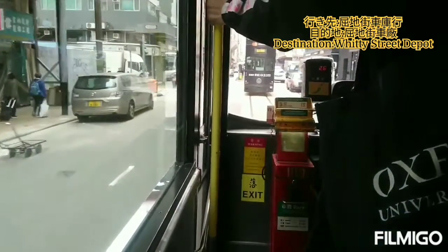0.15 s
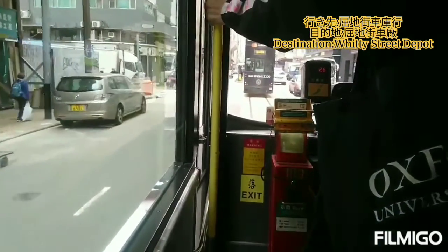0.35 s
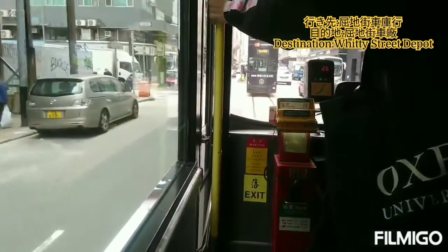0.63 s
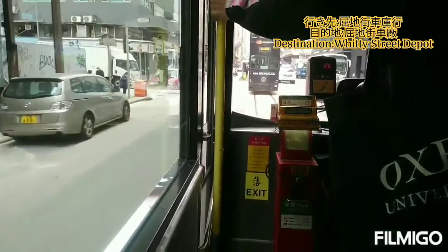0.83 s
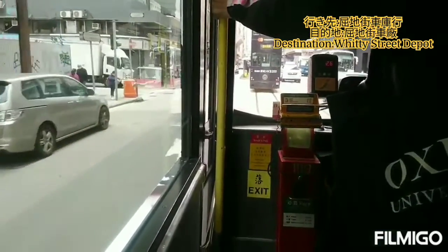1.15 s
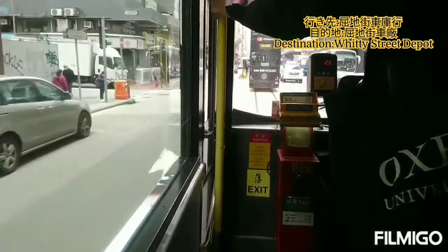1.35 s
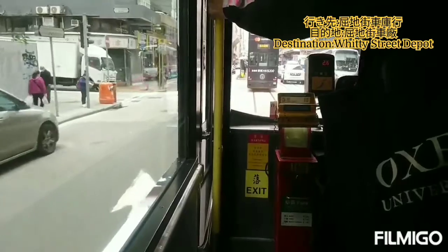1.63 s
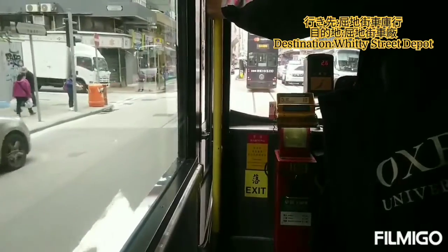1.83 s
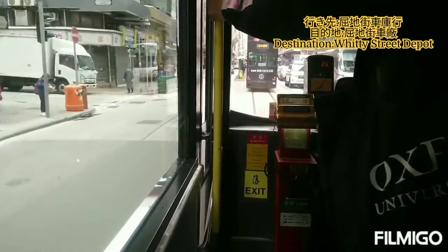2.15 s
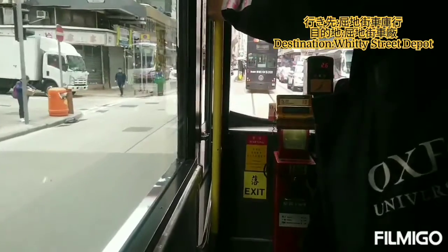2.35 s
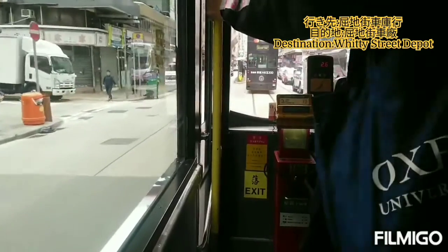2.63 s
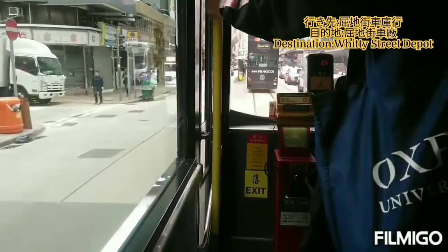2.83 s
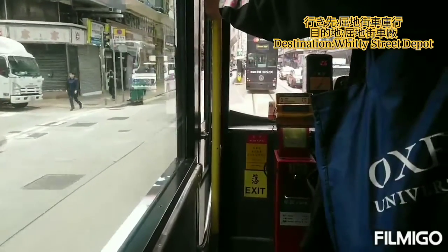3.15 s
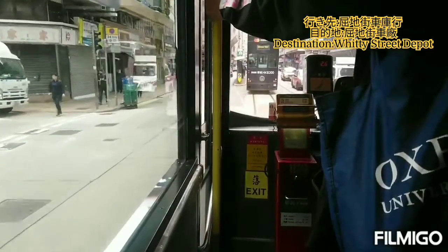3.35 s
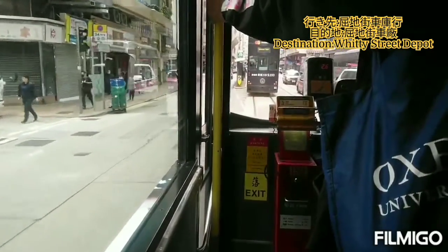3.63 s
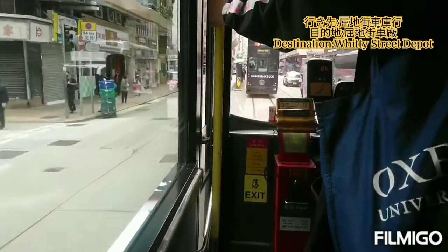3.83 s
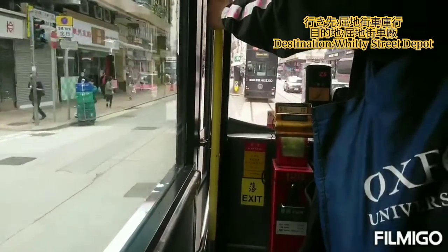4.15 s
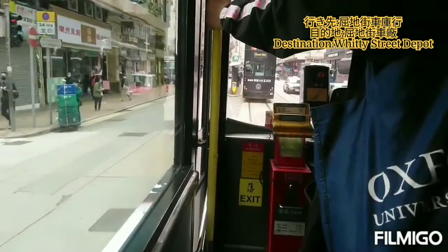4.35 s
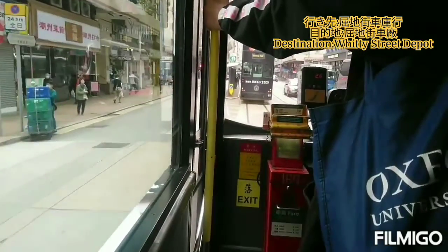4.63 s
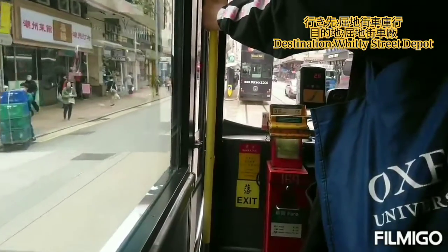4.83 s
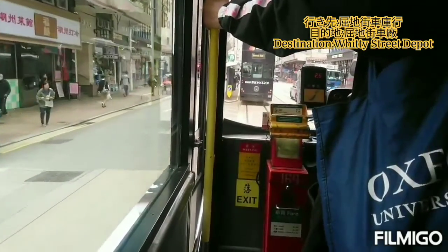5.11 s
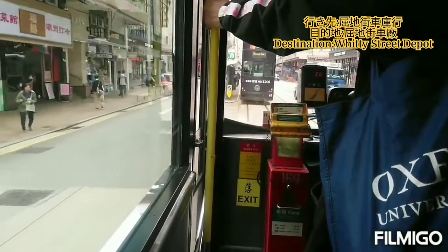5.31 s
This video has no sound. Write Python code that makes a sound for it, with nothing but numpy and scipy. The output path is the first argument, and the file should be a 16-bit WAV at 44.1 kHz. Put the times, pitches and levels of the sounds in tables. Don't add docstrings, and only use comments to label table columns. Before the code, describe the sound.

Wheels slam over rail joints at the very start, shaking the floor and panels of a tram with loud dense thuds and short metallic clatter. The car then rolls with a low, uneven rumble, soft taps and faint rattles. Another clear jolt lands just before two seconds, lighter ones near four and four and a half, then a faint wavering gear groan. Heard by a small microphone inside the cabin.

```python
import sys
import numpy as np
from scipy import signal
from scipy.io import wavfile
from scipy.ndimage import uniform_filter1d

SR = 44100
rng = np.random.default_rng(int(sys.argv[2]) if len(sys.argv) > 2 else 0)


def decibels_to_gain(level_db):
    exponent = np.asarray(level_db, float) / 20
    return 10 ** exponent


def dump(signal):
    limited = np.clip(np.atleast_2d(signal).T, -1, 1)
    pcm = np.round(limited * 32767).astype(np.int16)
    wavfile.write(sys.argv[1], SR, pcm)


N = 241336

# start_s, over_usual_db
RAIL_ROUGHNESS = [(0, -11.5), (.36, 3.5), (.5, 0.5), (.85, 2.5), (1.2, -0.5), (1.42, 1.5), (1.75, -2),
                  (2.05, -0.5), (2.25, 0), (2.77, 0.5), (3.1, -0.5), (3.6, -2), (3.95, 1), (4.3, -0.5),
                  (4.6, 7.5), (4.85, 2.5), (5.1, 2), (5.47, 0.5)]

# pitch_hz, width_hz, level_db
FLOOR_MODES = [(48, 7.6, -3.5), (68, 6.4, -6.5), (81.8, 13.6, -4)]
PANEL_MODES = [(126.8, 12, -10.5), (166.8, 13.5, -0.5), (196, 11.2, -1.5), (252, 8.9, -3.5),
               (292.7, 24.2, -1), (321.6, 13, -10.5)]
FRAME_MODES = [(375, 43, 1), (421, 52, -6.5), (500, 51, -4), (580, 120, -4.5), (688, 75, -14.5),
               (770, 86, -11)]
WHEEL_MODES = [(901, 120, -0.5), (1050, 110, -7.5), (1208, 160, -2.5), (1466, 170, -9), (1598, 440, -3.5)]
WINDOW_MODES = [(2120, 280, 1.5), (2400, 270, 1.5), (2623, 74, -2), (2850, 79, -3.5), (3180, 400, 1.5),
                (3300, 290, -10), (3870, 1100, -6.5)]
SMALL_METAL_MODES = [(4500, 360, -4.5), (5370, 300, -9), (5650, 610, -7), (6160, 130, -5)]
STRAP_MODES = [(7800, 450, 3.7), (8400, 350, 6), (9300, 440, 4)]
# pitch_hz, width_hz, level_db
PANE_MODES = [(3050, 200, -3.5), (3130, 240, -2.5), (3460, 460, -2.5)]
# pitch_hz, width_hz, level_db
CATCH_MODES = [(5160, 200, 1), (5300, 400, -2)]
# pitch_hz, width_hz, level_db
BUCKLE_MODES = [(9960, 250, -2.5), (10400, 250, 0.5)]
# pitch_hz, width_hz, level_db
SPRING_MODES = [(6160, 64, 0)]

# start_s, hold_s, panels_db, floor_over_panels_db
BODY_HEAVES = [(0.0, 0.004, -16.5, 16), (.035, 0.017, -19, -24), (.07, 0.018, -19.5, 0.5),
               (.135, 0.011, -23.5, 13), (.18, 0.01, -33, 10.5), (.235, 0.0073, -24.5, 6.5),
               (.28, 0.038, -39, 14.5), (.56, 0.04, -55, 17.5), (1.84, 0.036, -30, -11),
               (2.29, 0.075, -34, -18), (2.39, 0.075, -41.5, 12.5), (2.73, 0.12, -43, -11),
               (3.2, 0.073, -40, -12), (4.04, 0.052, -36.5, -4.5), (4.36, 0.0098, -38, -8),
               (4.43, .05, -46, -24), (4.81, 0.046, -37, -11)]
# start_s, hold_s, frame_db, wheels_over_frame_db
FRAME_SHUDDERS = [(.01, 0.022, -35.5, -7), (.065, 0.035, -30, -11.5), (.11, .004, -27.5, -7.5),
                  (.14, 0.006, -42, 0), (.18, 0.0045, -34, -22), (.24, 0.062, -40, -3.5),
                  (.3, 0.03, -47, -4.5), (1.865, 0.02, -36.5, -14), (2.3, 0.023, -50, -18.5),
                  (2.33, 0.036, -41.5, -10), (2.39, 0.059, -48.5, -3), (2.5, 0.019, -61.5, 5.5),
                  (2.72, .08, -62.5, -1), (2.84, 0.033, -64, 2.5), (2.93, .02, -70, -1),
                  (3.28, .1, -70.5, 2.5), (4.21, 0.052, -61.5, 2.5), (5.15, .04, -65.5, -2),
                  (5.39, 0.017, -64, 4), (4.025, 0.06, -41.5, -8.5), (3.85, 0.037, -60.5, -2),
                  (4.3, 0.015, -60, -3), (4.75, 0.027, -55.5, -11), (4.56, 0.046, -57, -7)]

# start_s, level_db, pitch_hz, length_s
FLOOR_BOOMS = [(0.012, -10.5, 80.4, 0.021), (0.098, -9, 53.2, 0.02), (0.127, -3.5, 66, 0.021),
               (0.156, -7.5, 52, 0.045), (0.221, -12, 55, 0.0458), (0.251, -10, 52.3, 0.066),
               (0.315, -18.5, 65.6, 0.038), (0.73, -17, 68, 0.033), (0.758, -18.5, 62.6, 0.024),
               (0.811, -32, 55.7, 0.018), (0.859, -33.5, 67.5, 0.056), (1.845, -26, 75.3, 0.02),
               (1.916, -13, 57.9, 0.034), (2.049, -27.5, 75.6, 0.013), (2.365, -26.5, 68, 0.034),
               (2.413, -17, 51.4, 0.056), (2.51, -33, 61, 0.038), (2.744, -32, 61.5, 0.033),
               (3.988, -20.5, 89, 0.0067), (4.012, -37, 91, 0.014), (4.039, -26.5, 60, 0.0327),
               (4.081, -34, 60, 0.033), (4.204, -28, 53, 0.077), (4.521, -27, 63, 0.021),
               (4.565, -20, 70, 0.013), (4.586, -24, 55.5, 0.04), (5.007, -38, 83.6, 0.029),
               (5.205, -37, 77, 0.018), (5.32, -47, 57, 0.072), (5.407, -46, 72.6, 0.02)]
# start_s, level_db, pitch_hz, length_s
PANEL_KNOCKS = [(0.027, -28, 213, 0.018), (0.081, -26, 224, 0.015), (0.098, -11.5, 250, 0.013),
                (0.138, -16.5, 196, 0.025), (0.166, -34, 171, 0.02), (0.219, -24.5, 252, 0.015),
                (0.238, -16, 198, 0.039), (0.264, -21, 212, 0.011), (0.286, -16, 201, 0.01),
                (0.337, -23, 206, 0.024), (0.687, -29.5, 283, 0.024), (0.718, -19, 260, 0.014),
                (1.51, -28.5, 183.5, 0.029), (1.825, -21.5, 250, 0.0048), (1.86, -12.5, 309, 0.016),
                (1.916, -21.5, 180, 0.011), (1.948, -26, 186, 0.029), (2.3, -27, 264, 0.042),
                (2.759, -31, 305, 0.029), (3.869, -30.5, 218, 0.016), (3.908, -32, 229, 0.0235),
                (3.983, -23, 196, 0.0077), (4.003, -18.5, 193, 0.012), (4.06, -26.5, 222, 0.012),
                (4.354, -46, 270, 0.033), (4.47, -28, 227, 0.021), (4.484, -21, 233, 0.011),
                (4.512, -24, 237, 0.015), (4.55, -28.5, 180, 0.03), (5.308, -34.5, 227, 0.029), ]
# start_s, level_db, pitch_hz, length_s
FRAME_CLUNKS = [(0.02, -33, 535, 0.014), (0.06, -24, 524, 0.018), (0.089, -23, 510, 0.02),
                (0.114, -29, 583, 0.011), (0.137, -14.5, 465, 0.0125), (0.154, -32, 520, 0.006),
                (0.169, -26, 550, 0.011), (0.18, -24, 432, 0.014), (0.231, -48, 515, 0.043),
                (0.797, -39, 454, 0.011), (1.296, -40, 424, 0.026), (1.321, -38.5, 385, 0.021),
                (1.832, -41, 453, 0.011), (1.858, -60, 550, 0.012), (1.876, -31.5, 424, 0.032),
                (1.918, -51, 467, 0.027), (2.33, -46, 603, 0.022), (2.396, -39, 850, 0.013),
                (3.25, -47, 500, 0.0079), (4.018, -33, 793, 0.0093), (4.049, -29, 550, 0.008),
                (4.74, -33.5, 476, 0.0097), (4.808, -55, 627, 0.02), (5.376, -43.5, 528, 0.031)]
# start_s, level_db, pitch_hz, length_s
HANDRAIL_RINGS = [(0.06, -26, 630, .016), (0.1, -33, 860, 0.012), (0.26, -38.5, 883, 0.026),
                  (1.857, -36, 770, 0.011), (1.99, -46, 770, 0.013), (2.226, -46.5, 770, 0.033),
                  (2.335, -42, 543, 0.0084), (2.35, -48, 733, 0.035), (2.396, -47, 1050, 0.017),
                  (3.245, -47.5, 500, 0.032), (4.016, -44, 903, 0.018), (4.3, -50, 722, 0.016)]
# start_s, level_db, lowest_hz, highest_hz, time_to_fall_60_db_s
SHARP_TICKS = [(0.0, -32, 4000, 15400, 0.0014), (0.068, -27, 500, 2970, 0.014),
               (1.7627, -42.5, 1500, 4200, 0.0037), (1.864, -48.5, 600, 3580, 0.059),
               (2.398, -60, 704, 4020, 0.046), (3.474, -60, 2400, 4200, .1),
               (3.735, -60, 2500, 6300, 0.028), (4.019, -51.5, 603, 3400, 0.066),
               (4.645, -48, 500, 1610, .03), (4.812, -56, 500, 1220, .03), (2.501, -49, 795, 3870, 0.06)]

# start_s, hold_s, windows_db, small_metal_over_windows_db
WINDOW_RATTLES = [(.01, 0.036, -47.5, -22), (.08, .015, -42, -19.5), (.11, .004, -49, -11),
                  (.145, .01, -52, -5), (.18, 0.069, -53, -11), (.27, 0.01, -50, -13.5),
                  (.35, .01, -64, -21), (.44, .005, -61, -17), (.84, 0.0073, -62, -15),
                  (1.645, 0.0095, -82, -6), (1.78, 0.0078, -68, -23), (1.87, 0.096, -66.5, -7.5),
                  (2.05, 0.37, -69, -39), (2.395, 0.067, -59.5, -21), (2.49, 0.05, -64.5, -15),
                  (2.58, .03, -70, -30), (2.65, 0.74, -72.5, -31), (2.86, .01, -76.5, -9),
                  (3.47, 0.01, -64.5, -16.5), (4.03, 0.027, -64, -13), (4.6, 0.82, -73.5, -28),
                  (5.41, 0.0074, -78, -13)]
# start_s, hold_s, level_db
STRAP_JINGLES = [(.04, 0.063, -70), (.11, 0.0054, -69), (.17, 0.036, -74), (.27, .01, -76.5),
                 (.32, 0.02, -80.5), (.79, 0.058, -82), (1.97, .03, -80), (2.37, 0.12, -76),
                 (2.53, 0.039, -79.5), (2.86, .01, -83.5), (4.54, 0.033, -89)]
# start_s, hold_s, level_db
AIR_RUSTLES = [
    (.004, 0.013, -76),
    (.26, 0.1, -81.5),
    (.8, 0.073, -77),
    (1., .4, -87),
    (1.92, .35, -88),
    (2.38, 0.12, -93),
]

# start_s, level_db, pitch_hz, length_s
MORE_FLOOR_BOOMS = [(.122, -18, 60, 0.031), (.378, -38, 70.5, 0.031), (.423, -36, 58.6, 0.023),
                    (.56, -36.5, 67, 0.052), (.845, -33, 60, 0.023), (2.083, -35, 73, 0.028),
                    (2.178, -34, 72, 0.025), (2.59, -36.5, 64.3, 0.027), (2.862, -39, 77, 0.024),
                    (3.35, -39, 70, 0.032), (3.858, -41, 73, 0.028), (4.348, -39.5, 77, 0.032),
                    (4.653, -34.5, 76, 0.032), (5.136, -35, 68, 0.029)]
# start_s, level_db, pitch_hz, length_s
MORE_BODY_KNOCKS = [(.218, -16.5, 213, 0.019), (.947, -34, 248, 0.011), (1.425, -42, 252, 0.025),
                    (1.567, -29.5, 222, 0.011), (2.0, -30.5, 212, 0.021), (2.275, -32.5, 267, .02),
                    (3.776, -33.5, 197, 0.016), (3.99, -33, 132, 0.023), (4.012, -21.5, 200, 0.017),
                    (4.102, -40, 183, 0.014), (4.308, -32.5, 196, 0.02), (4.368, -28, 290, .018),
                    (4.531, -33, 222, 0.013), (4.776, -28, 311, 0.021), (4.876, -31, 266, 0.019),
                    (5.25, -32, 191, 0.022), (5.37, -36, 217, 0.016), (.232, -28.5, 430, 0.015),
                    (.348, -36.5, 476, 0.015), (.607, -47, 485, .014), (.888, -49, 443, .014),
                    (1.381, -49, 473, .014), (1.893, -38, 417, 0.0143), (2.68, -52, 456, .014),
                    (2.784, -44, 421, 0.014), (2.818, -44, 414, 0.018), (3.001, -51, 454, .014),
                    (4.062, -37, 500, .02), (4.185, -38, 430, 0.015), (4.386, -41, 412, 0.015),
                    (4.76, -39, 503, .014), (4.807, -42, 460, .014), (4.846, -44, 396, 0.015)]
# start_s, level_db, pitch_hz, length_s
METAL_PINGS = [(.127, -24, 700, 0.0123), (.622, -58, 742, .012), (.834, -51, 710, .012),
               (1.789, -50, 875, .012), (1.89, -40, 900, 0.012), (2.04, -50, 813, .012),
               (2.087, -57, 801, .012), (2.499, -47, 880, .012), (2.521, -54, 885, 0.011),
               (2.591, -48.5, 780, .012), (2.928, -50.5, 901, 0.013), (4.163, -49, 760, .012),
               (4.186, -52, 745, .012), (4.524, -43, 748, .012), (4.581, -45, 780, .012),
               (4.641, -43.5, 780, .012), (5.116, -40, 745, .012), (5.224, -50, 740, .012),
               (5.416, -45, 710, .012), (.062, -34, 1470, 0.012), (.099, -31.5, 1260, 0.0089),
               (.087, -38, 1990, .008), (.131, -38, 2120, 0.011), (.134, -32, 1555, 0.009),
               (1.7625, -46.5, 3190, 0.00293), (.94, -52, 1110, .01), (1.438, -51, 1170, 0.0082),
               (1.918, -56, 1245, .01), (2.327, -55, 1410, 0.0074), (2.397, -42, 1540, 0.0088),
               (2.455, -51.5, 1490, 0.014), (2.495, -48.5, 1240, 0.0094), (2.748, -55, 1280, 0.0073),
               (2.939, -52, 1129, .01), (3.015, -52.5, 1170, 0.0073), (3.292, -59, 1240, 0.011),
               (3.553, -59.5, 2420, .01), (4.221, -58, 1199, 0.011), (4.322, -52, 1430, 0.0088),
               (3.478, -63, 2400, .012), (5.154, -57, 1270, 0.0092)]
# start_s, hold_s, level_db
PANE_BUZZES = [(.095, .015, -44.5), (.14, .01, -52.5), (.28, 0.017, -57.5), (.76, 0.012, -68.5),
               (1.865, 0.012, -60.5), (1.97, .04, -67), (2.015, .01, -69), (2.048, 0.0085, -75),
               (2.19, 0.017, -73), (2.41, 0.06, -63), (2.5, 0.033, -62.5), (2.56, 0.033, -67),
               (2.67, 0.02, -74), (2.85, 0.025, -74.5), (3.07, .02, -75), (3.18, 0.049, -72),
               (3.735, 0.0088, -76), (5.39, .01, -71)]
# start_s, hold_s, level_db
CATCH_CHATTERS = [
    (.09, 0.072, -65),
    (.29, 0.023, -72.5),
    (.505, .01, -82),
    (1.865, .1, -75),
    (2.53, 0.027, -86.5),
    (2.86, .01, -92),
    (4.03, 0.034, -75.5),
    (4.09, 0.018, -81),
]
# start_s, hold_s, level_db
BUCKLE_TINKLES = [
    (.03, 0.049, -80),
    (.15, 0.055, -70.5),
    (.25, 0.081, -76),
]
# start_s, hold_s, level_db
SPRING_SONGS = [
    (1.95, 0.083, -82),
    (2.36, 0.11, -76.5),
    (2.52, 0.12, -88),
]

# start_s, hold_s, level_db
GEAR_GROANS = [
    (4.64, 0.029, -51),
    (4.71, 0.01, -54),
    (4.815, 0.015, -47.5),
    (4.94, 0.025, -45.5),
    (5.03, 0.039, -47.5),
    (5.12, 0.035, -60.5),
    (5.23, 0.0084, -55),
    (5.35, .02, -58),
]

BODY_RISE, FITTING_RISE, HUM_RISE = 820, 3200, 350
PANEL_FALL, FRAME_FALL, WHEEL_FALL = 650, 214, 170
WINDOW_FALL, METAL_FALL, BUZZ_FALL, HUM_FALL = 127, 260, 280, 180


def rumble():
    floor_gain = rolling(-48.5, 0.5, swells(BODY_HEAVES, BODY_RISE, PANEL_FALL, second=True))
    panel_gain = rolling(-42, 0.91, swells(BODY_HEAVES, BODY_RISE, PANEL_FALL))
    frame_gain = rolling(-52.5, 0.7, swells(FRAME_SHUDDERS, BODY_RISE, FRAME_FALL))
    wheel_gain = rolling(-63, 1.0, swells(FRAME_SHUDDERS, BODY_RISE, WHEEL_FALL, second=True))
    low = floor_gain * shaken(FLOOR_MODES, patchy_db=-0.5, rate=3.2, grain_db=-4.0)
    low += panel_gain * shaken(PANEL_MODES, patchy_db=2.5, rate=8.8, grain_db=1.0)
    frame = frame_gain * shaken(FRAME_MODES, patchy_db=2.5, rate=3.4, grain_db=2.0)
    wheels = filtered(shaken(WHEEL_MODES, patchy_db=2.0, rate=6.0, grain_db=1.6), 2, 2000)
    return filtered(low, 2, 700) + frame + wheel_gain * wheels


def rail_joints():
    out = jolts(FLOOR_BOOMS, swell=0.59, fade=0.34, sag=0.021, rough=0.18)
    out += jolts(PANEL_KNOCKS, swell=0.38, fade=0.34, sag=0.036, rough=0.0044)
    out += jolts(FRAME_CLUNKS, swell=0.27, fade=0.43, sag=0.0075, rough=0.059)
    return out + jolts(HANDRAIL_RINGS, swell=0.36, fade=0.87, sag=0.0033, rough=0.01)


def ticks():
    length = 6000
    out = np.zeros(N + length)
    for start_s, level_db, low_hz, high_hz, t60 in SHARP_TICKS:
        burst = rng.standard_normal(length) * decibels_to_gain(-60 * np.arange(length) / SR / t60)
        burst[0] = 6
        burst = filtered(burst, 4, [low_hz, high_hz], "band")
        at = int(start_s * SR)
        out[at:at + length] += decibels_to_gain(level_db) * burst / np.abs(burst).max()
    return out[:N]


def fittings():
    windows = filtered(shaken(WINDOW_MODES, patchy_db=1.6, rate=5.0, grain_db=1.8), 8, 4250)
    windows *= rolling(-74, 0.49, swells(WINDOW_RATTLES, FITTING_RISE, WINDOW_FALL))

    metal_gain = decibels_to_gain(-102.5) + swells(WINDOW_RATTLES, FITTING_RISE, METAL_FALL, second=True)
    metal = metal_gain * shaken(SMALL_METAL_MODES, patchy_db=2.5, rate=2.2, grain_db=-1.5)
    strap_gain = decibels_to_gain(-103) + swells(STRAP_JINGLES, FITTING_RISE, METAL_FALL)
    straps = shaken(STRAP_MODES, patchy_db=2.0, rate=8.0, grain_db=1.0)
    straps = strap_gain * filtered(straps, 4, [7500, 9600], "band")
    bright = filtered(filtered(metal, 8, 6700) + straps, 4, 4300, "high")

    air = rms_one(filtered(rng.standard_normal(N), 6, [11800, 15300], "band"))
    air_gain = decibels_to_gain(-99) + swells(AIR_RUSTLES, rise=400, fall=300)
    return windows + bright + air_gain * air


def further_sounds():
    out = jolts(MORE_FLOOR_BOOMS, swell=0.44, fade=0.5, sag=0.018, rough=0.17)
    out += jolts(MORE_BODY_KNOCKS, swell=0.38, fade=0.29, sag=0.018, rough=0.019)
    out += jolts(METAL_PINGS, swell=0.4, fade=0.55, sag=0.004, rough=0.01)
    pane = shaken(PANE_MODES, patchy_db=1.0, rate=11.0, grain_db=4.5)
    out += swells(PANE_BUZZES, FITTING_RISE, BUZZ_FALL) * pane
    catch = shaken(CATCH_MODES, patchy_db=0.5, rate=17.0, grain_db=2.0)
    out += swells(CATCH_CHATTERS, FITTING_RISE, BUZZ_FALL) * catch
    buckle = shaken(BUCKLE_MODES, patchy_db=6.0, rate=9.0, grain_db=0.0)
    out += swells(BUCKLE_TINKLES, FITTING_RISE, BUZZ_FALL) * buckle
    spring = shaken(SPRING_MODES, patchy_db=4.5, rate=20.0, grain_db=3.5)
    return out + swells(SPRING_SONGS, HUM_RISE, BUZZ_FALL) * spring


def gear_hum():
    t = np.arange(N) / SR
    pitch_hz = 725 * (1 + 0.022 * drift(16.0))
    groan = np.sin(2 * np.pi * np.cumsum(pitch_hz) / SR)
    rough = resonance(resonance(rng.standard_normal(N), 750, 110), 750, 110)
    groan += 0.45 * rms_one(rough)
    whistle = resonance(resonance(rng.standard_normal(N), 2630, 160), 2630, 160)
    sounding = (t > 4.4) & (t < 6.4)
    whistle_gain = decibels_to_gain(-78) * uniform_filter1d(sounding * 1.0, size=4000)
    return decibels_to_gain(0.5) * swells(GEAR_GROANS, HUM_RISE, HUM_FALL) * groan + whistle_gain * rms_one(whistle)


def jolts(rows, swell, fade, sag, rough):
    margin = 4000
    out = np.zeros(N + SR)
    for start_s, level_db, hz, length in rows:
        t = np.arange(int(-length * SR), int(2.5 * length * SR)) / SR
        from_top = t - length / 2
        slope = np.where(from_top < 0, swell, fade) * length
        shape = np.exp(-np.abs(from_top / slope) ** 1.13)
        shape *= signal.windows.tukey(len(t), 0.4)
        turns = hz * from_top * (1 - sag * from_top / length) + rng.random()
        phase = 2 * np.pi * turns
        swing = np.sin(phase) + rough * np.sin(2 * phase + 1) + 0.94 * rough * np.sin(3 * phase)
        at = int((start_s - length) * SR) + margin
        out[at:at + len(t)] += decibels_to_gain(level_db) * shape * swing
    return out[margin:N + margin]


def shaken(modes, patchy_db, rate, grain_db):
    together = drift(rate)
    grain = decibels_to_gain(grain_db * drift(110.0))
    out = 0
    for hz, width, level_db in modes:
        push = rng.standard_normal(N) * grain
        swing = resonance(resonance(push, hz, 1.2 * width), hz, 5.85 * width)
        flicker = decibels_to_gain(patchy_db * (0.31 * together + drift(rate)))
        out = out + decibels_to_gain(level_db) * flicker * rms_one(swing)
    return rms_one(out)


def rolling(usual_db, rail_share, events):
    start_s, over_db = np.transpose(RAIL_ROUGHNESS)
    roughness_db = np.interp(np.arange(N) / SR, start_s, over_db)
    return np.hypot(decibels_to_gain(usual_db + rail_share * roughness_db), events)


def swells(rows, rise, fall, second=False):
    t = np.arange(0, N + 64, 64) / SR
    power = 0
    for start_s, hold_s, level_db, *over_db in rows:
        if second:
            level_db = level_db + over_db[0]
        loss_db = rise * np.maximum(start_s - t, 0) + fall * np.maximum(t - start_s - hold_s, 0)
        power = power + decibels_to_gain(level_db - loss_db) ** 2
    return np.interp(np.arange(N) / SR, t, np.sqrt(power))


def drift(rate):
    step = 40
    r = np.exp(-2 * np.pi * rate * step / SR)
    white = rng.standard_normal(N // step + 2002)
    slow = signal.lfilter([1], [1, -2 * r, r * r], white)[2000:]
    return np.interp(np.arange(N) / step, np.arange(len(slow)), rms_one(slow))


def resonance(x, hz, width):
    r = np.exp(-np.pi * width / SR)
    push = np.array([1, 0, -1]) * (1 - r * r) / 2
    return signal.lfilter(push, [1, -2 * r * np.cos(2 * np.pi * hz / SR), r * r], x)


def filtered(x, order, hz, kind="low"):
    return signal.sosfilt(signal.butter(order, hz, kind, fs=SR, output="sos"), x)


def rms_one(x):
    return x / np.sqrt(np.mean(x ** 2) + 1e-20)


def scene():
    return (rumble() + rail_joints() + ticks() + fittings() + further_sounds() + gear_hum())[None]


def top_cut(x):
    return signal.sosfilt(signal.butter(12, 15460, fs=SR, output="sos"), x)


def record(dry):
    heard = filtered(dry, 3, 40, "high")
    hiss = rng.standard_normal(heard.shape)
    hiss = hiss - 0.72 * filtered(hiss, 1, [4200, 7000], "band")
    mix = heard + decibels_to_gain(-86.5) * hiss
    return top_cut(mix)


dry = scene()
out = record(dry)
dump(out)
```